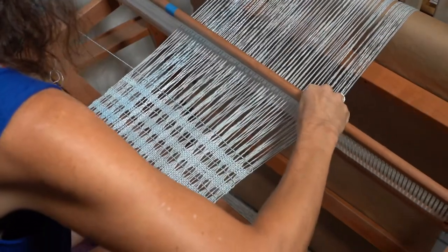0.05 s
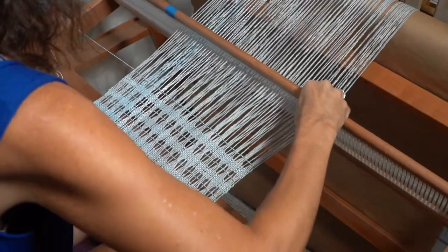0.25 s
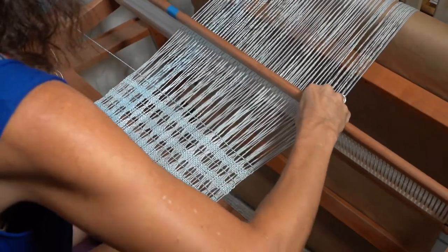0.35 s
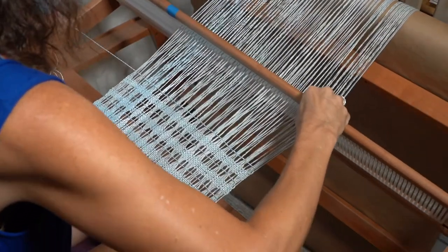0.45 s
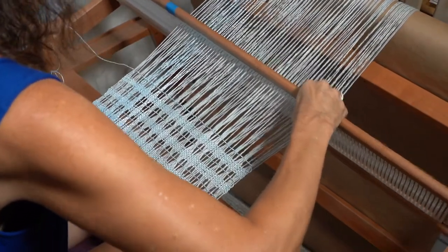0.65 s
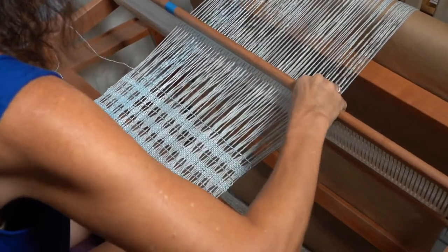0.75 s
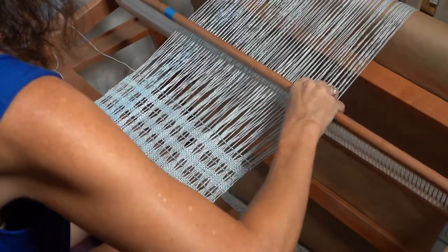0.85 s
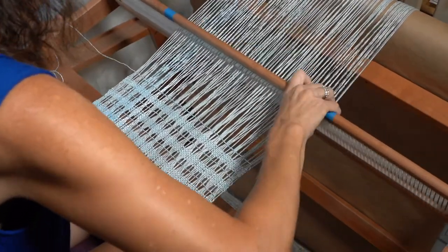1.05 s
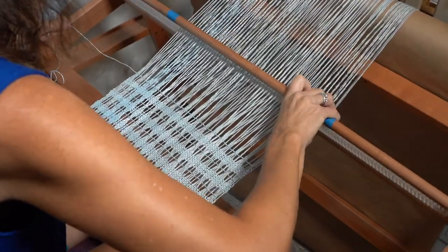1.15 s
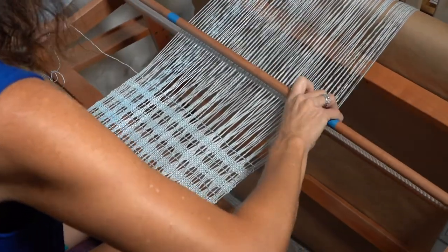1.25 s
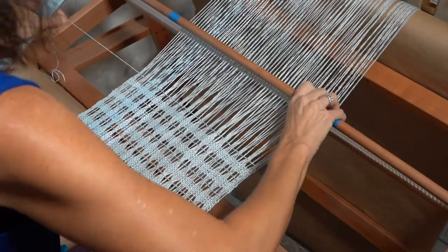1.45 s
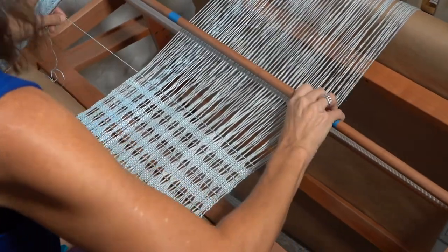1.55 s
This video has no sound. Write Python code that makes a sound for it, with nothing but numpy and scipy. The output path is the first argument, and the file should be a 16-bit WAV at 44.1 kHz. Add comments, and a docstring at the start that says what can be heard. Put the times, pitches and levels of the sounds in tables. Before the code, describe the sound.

A wooden heddle bar knocks on a loom, close up over a low room hum. At 0.2 seconds it knocks hard and rattles, with a deep shudder. Yarn rasps faintly from about 0.4 seconds into more knocks at 0.75, a short wooden scrape and a second shudder. A knock at 0.9 leaves a faint wire zing. A last rattle around 1.2 thins into small wire ticks by 1.5 seconds.

```python
"""A wooden heddle bar is shifted by hand on a loom, close up in a small quiet room.
Over a low hum, warp yarn rasps through the slots; the bar knocks and rattles against the frame, and
the loom sways with a deep shudder. A longer rasp leads into more knocks, wood sliding on wood and a
second shudder. A heddle wire zings, and a last rattle thins out into small wire ticks.
The hardest knocks overload the microphone."""
import sys
import numpy as np
from scipy import signal
from scipy.fft import rfft, irfft
from scipy.io import wavfile

SR = 44100
rng = np.random.default_rng(int(sys.argv[2]) if len(sys.argv) > 2 else 0)


def store_pcm(level_fs):
    """Save levels as 16-bit WAV."""
    pcm = np.round(np.clip(level_fs, -1, 1) * 32767).astype(np.int16)
    wavfile.write(sys.argv[1], SR, np.atleast_2d(pcm).T)


N = 70560

# room tone: f/Hz, level/dB
AIR_EQ = [(20, 2.5), (35, -1.5), (50, 3.5), (90, -14.5), (125, -10), (180, -13.5), (400, -24.5),
          (1500, -32.5), (4000, -39.5), (7000, -40), (10000, -44), (16000, -48.5)]
# yarn strokes: peak t/s, rise/s, fall/s, then level/dB of rasp, whistle, swish and fine hiss
YARN_STROKES = [(0.0, 0.016, 0.036, -41, -55, -58, -58), (0.235, 0.029, 0.076, -46, -52, -43, -56.5),
                (0.154, 0.025, 0.037, -40.5, -39, -38.5, -55), (0.378, 0.011, 0.022, -42, -47, -39, -52),
                (0.499, 0.24, 0.1, -40, -46, -52, -57.5), (0.572, .03, 0.028, -58.5, -65, -57, -56),
                (0.701, 0.031, 0.034, -38, -33.5, -60, -54), (0.728, 0.015, 0.019, -31.5, -38, -52, -46),
                (1.159, 0.02, 0.017, -33, -46, -28, -38), (1.181, 0.016, 0.0047, -31, -42, -29, -45)]
# the yarn's coarse rasp, bright swish and fine hiss, each: f/Hz, level/dB
RASP_EQ = [(150, -14), (400, -1), (1500, 6), (2400, -1), (3200, -1.5), (5000, -12.5), (8000, -11),
           (10000, -30), (16000, -27)]
SWISH_EQ = [(2000, -12), (5800, -5.5), (6600, 2), (7500, -1.5), (8400, -0.5), (9500, -24), (16000, -27)]
HISS_EQ = [(2000, -25), (6000, -10), (8200, 2), (10500, 2), (13500, 9), (16000, -17)]
# bar hits: t/s, level/dB, brightness f/Hz, bass level/dB, frame and room level/dB,
# then f/Hz, level/dB for each of two notes favoured by the point struck
BAR_HITS = [(0.2, 0.5, 1830, 2.5, 1, 1482, -1.5, 1800, -7), (0.2126, -12.5, 1420, -7, 0, 398, -1, 598, -5),
            (0.2352, -7.5, 2390, -10, -3.5, 1620, -3.5, 2850, -6),
            (0.2934, -16.5, 2820, 8.5, 1.5, 550, 0, 293, -1), (0.302, -14, 900, 6.5, 4, 652, -2, 450, -7.5),
            (0.371, -20.5, 2400, 2.5, 2, 1940, 2.5, 1210, -5.5), (0.669, -36, 700, 6, 1, 590, 4.5, 430, -5),
            (0.75, -0.5, 4860, -13, 0.5, 2893, 5.5, 1855, -2),
            (0.8083, -14, 6030, 6, 7.5, 6880, -0.5, 1720, -6),
            (0.9071, -4.5, 4640, -4.5, -2.5, 1115, -8, 5200, -3.5),
            (1.0279, -25, 2320, 15, 0, 320, -2, 233, 0.5),
            (1.067, -16, 2080, 10, -6.5, 1534, -3.5, 1870, 1),
            (1.1859, -2.5, 7100, -15, -2.5, 3800, 1, 4260, -1.5),
            (1.2126, -8.5, 4040, -9, -2, 1427, -1.5, 618, -9),
            (1.2656, -16, 8900, -9, 5, 4350, -6, 2900, 5), (1.288, -9.5, 2920, -3.5, -4, 820, -2, 577, -13),
            (1.4, -41.5, 8100, 2, 8, 4300, 0, 6000, -6),
            (1.5001, -32.5, 5800, -24, 2.5, 2330, -1.5, 2960, 5)]
# crack of contact: f/Hz, level/dB
CRACK_EQ = [(150, -21), (500, -5.5), (1000, -4.5), (1700, 7.5), (2300, -9.5), (3000, -0.5), (6500, 0.5),
            (9000, -3.5), (16000, -22)]
# modes of bar and frame, each: f/Hz, level/dB, t60/s
BAR_MODES = [(252, -23.5, 0.036), (395, -18, 0.13), (582, -27, 0.099), (822, -17.5, 0.11),
             (1324, -7, 0.031), (1556, -11.5, 0.053), (1775, -7.5, 0.049), (2038, -4, 0.027),
             (2556, -9.5, 0.047), (2907, 0, 0.016), (3900, -10, 0.014), (5060, -2, 0.0072),
             (6780, -3.5, 0.018)]
FRAME_MODES = [(209.1, 1.5, 0.24), (295, -5.5, 0.24), (388.8, 10, 0.22), (493.3, -1, 0.2), (571.6, 2, 0.39),
               (798, 0, 0.14), (1270, -0.5, 0.28), (1567, -12, 0.21), (1958, -1, 0.22), (2230, -5, 0.089),
               (2660, 1.5, 0.19), (2936, -5, 0.28), (4760, -5, 0.43)]
# dense tail of frame and room: f/Hz, level/dB, t60/s
TAIL_SPECTRUM = [(139, -6.5, 0.66), (207, 0, 0.71), (486, 5, 0.34), (1000, 0.5, 0.36), (1760, -1, 0.34),
                 (3240, -6.5, 0.46), (6500, -6.5, 0.42), (9450, -19, 0.49), (16000, -18, 0.43)]
# shoves that rock the loom: t/s, level/dB
LOOM_SHOVES = [(0.22, -9), (0.280, -3.5), (0.778, -8), (0.831, -1.5)]
# the loom's swaying modes: f/Hz, level/dB, t60/s
SWAY_MODES = [(20.37, -5, 1.64), (20.4, 6.5, 0.17), (64, -19, 0.46)]
# wood sliding on wood: peak t/s, rise/s, fall/s, level/dB
WOOD_SLIDES = [(0.792, 0.037, 0.031, -16.5), (1.049, 0.052, 0.09, -39), (1.228, 0.027, 0.016, -23),
               (1.273, 0.0029, 0.014, -35)]
# tone of the sliding wood: f/Hz, level/dB
WOOD_EQ = [(130, 4), (220, 4.5), (450, 6), (1000, -4.5), (3000, -4.5), (5200, -13), (7200, -10.5),
           (9500, -26), (16000, -34)]
# heddle wire ticks: t/s, level/dB
WIRE_TICKS = [(1.26, -27), (1.2658, -20.5), (1.402, -36), (1.5, -32.5), (1.511, -39)]
# tone of a tick: f/Hz, level/dB
TICK_EQ = [(500, -33), (3000, 8), (7000, -1), (15000, -10)]


def amp(db):
    return 10 ** (np.asarray(db) / 20)


def unit_rms(x):
    return x / np.sqrt(np.mean(x ** 2))


def along(table, hz, column=1):
    """Read a table column on a log-frequency axis."""
    points = np.array(table, float)
    return np.interp(np.log(hz + 1), np.log(points[:, 0]), points[:, column])


def colour(x, eq):
    """Shape a steady signal with an EQ curve, at rms 1."""
    gain = amp(along(eq, np.fft.rfftfreq(N, 1 / SR)))
    return unit_rms(irfft(rfft(x) * gain, N))


def noise(eq):
    return colour(rng.standard_normal(N), eq)


def add(out, x, start):
    i = int(start * SR)
    out[i:] += x[:N - i]


def sine(t, hz):
    return np.sin(2 * np.pi * hz * t)


def fade(t, t60):
    return np.exp(-np.log(1000) * t / t60)


def lowpass(x, hz, order=2):
    return signal.sosfilt(signal.butter(order, hz, fs=SR, output="sos"), x)


def room_tone(t, hum_hz=124.65):
    """A bed of quiet air and low hum."""
    return amp(-32) * noise(AIR_EQ) + amp(-45) * unit_rms(sine(t, hum_hz))


def swell(t, peak, rise, fall):
    """The smooth envelope of a hand stroke."""
    return np.exp(-((t - peak) / np.where(t < peak, rise, fall)) ** 2)


def friction(eq, density=.15, grain_db=3):
    """Dense tiny catches of uneven size, coloured by what they rub."""
    catches = (rng.random(N) < density) * rng.standard_normal(N)
    sizes = amp(grain_db * np.minimum(rng.exponential(size=N), 4))
    return colour(catches * sizes, eq)


def singing_band(hz, width_hz):
    """Narrow noise, like many close resonances singing together."""
    x = rng.standard_normal(N)
    for width in (width_hz, 2 * width_hz):
        x = signal.lfilter(*signal.iirpeak(hz, hz / width, fs=SR), x)
    return unit_rms(x)


def yarn(t):
    """Warp yarn drags through the slots: rasp, whistle, swish and hiss share each stroke's swell."""
    out = np.zeros(N)
    rasp, swish, hiss = (friction(eq) for eq in (RASP_EQ, SWISH_EQ, HISS_EQ))
    whistle = singing_band(hz=6980, width_hz=480)
    for peak, rise, fall, *levels in YARN_STROKES:
        blend = sum(amp(db) * layer for db, layer in zip(levels, (rasp, whistle, swish, hiss)))
        out += swell(t, peak, rise, fall) * blend
    return out


def struck_wood(t, modes):
    """Wood rings as damped sines of alternating polarity."""
    return sum((-1) ** k * amp(db) * fade(t, t60) * sine(t, hz) for k, (hz, db, t60) in enumerate(modes))


def tail(t, build_s=0.0036, bass_build_s=0.015, early_db=4, early_s=.012):
    """Frame and room ring on, each band at its own rate; the lows bloom late."""
    spectrum, hz = rfft(noise(TAIL_SPECTRUM)), np.fft.rfftfreq(N, 1 / SR)
    edges_hz = [0, 300, 700, 1500, 3000, 6000, 10000, SR]
    wash = np.zeros(N)
    for lo, hi in zip(edges_hz, edges_hz[1:]):
        band = irfft(spectrum * ((hz >= lo) & (hz < hi)), N)
        wash += band * fade(t, along(TAIL_SPECTRUM, (lo + hi) / 2, column=2))
    wash -= lowpass(wash, hz=600, order=1) * np.exp(-t / bass_build_s)
    attack = 1 - np.exp(-t / build_s)
    early_lift = 1 + amp(early_db) * np.exp(-t / early_s)
    return wash * attack * early_lift


def strike_note(t, hz, q=17):
    """A resonance favoured by the point struck."""
    return np.exp(-np.pi * hz * t / q) * sine(t, hz)


def knocks(t, crack_s=0.0019, edge_db=-25):
    """Each hit cracks and rings the bar, frame and room; a softer contact is duller."""
    out = np.zeros(N)
    bar = amp(-4.5) * struck_wood(t, BAR_MODES)
    frame = amp(-27.5) * struck_wood(t, FRAME_MODES)
    for start, db, bright_hz, bass_db, ring_db, hz1, db1, hz2, db2 in BAR_HITS:
        crack = amp(-0.5) * noise(CRACK_EQ) * np.exp(-t / crack_s)
        ring = amp(-14) * tail(t) + frame
        hit = crack + bar + amp(ring_db) * ring
        hit += (amp(bass_db) - 1) * lowpass(hit, hz=550, order=1)  # bass shelf
        hit = lowpass(hit, bright_hz) - amp(edge_db) * hit  # dulled, with a trace of edge
        notes = amp(db1) * strike_note(t, hz1) + amp(db2) * strike_note(t, hz2)
        add(out, amp(db) * (hit + notes), start)
    return out


def sway(t, attack_s=0.023):
    """Each shove rocks the whole loom in a deep shudder."""
    out = np.zeros(N)
    shudder = sum(amp(db) * fade(t, t60) * sine(t, hz) for hz, db, t60 in SWAY_MODES)
    shudder *= 1 - np.exp(-t / attack_s)
    for start, db in LOOM_SHOVES:
        add(out, -amp(db) * shudder, start)
    return out


def slides(t):
    """The bar rubs along the frame in short, dark scrapes."""
    wood = friction(WOOD_EQ)
    return sum(amp(db) * swell(t, peak, rise, fall) * wood for peak, rise, fall, db in WOOD_SLIDES)


def wires(t, tick_s=0.0063):
    """A heddle wire zings after a knock; later the wires give small, sharp ticks."""
    out = np.zeros(N)
    zing = singing_band(hz=6000, width_hz=450) * fade(t, t60=0.35)
    add(out, amp(-30) * zing, start=0.912)
    for start, db in WIRE_TICKS:
        add(out, amp(db) * noise(TICK_EQ) * np.exp(-t / tick_s), start)
    return out


def scene():
    """The loom over its room tone, in mono."""
    t = np.arange(N) / SR
    return (room_tone(t) + yarn(t) + knocks(t) + sway(t) + slides(t) + wires(t))[None]


def record(dry, top_hz=15900):
    """The hardest knocks clip the microphone; a steep high cut follows."""
    high_cut = signal.ellip(8, .2, 70, top_hz, fs=SR, output="sos")
    return signal.sosfilt(high_cut, np.clip(dry, -1, 1))


dry = scene()
out = record(dry)
store_pcm(out)
```